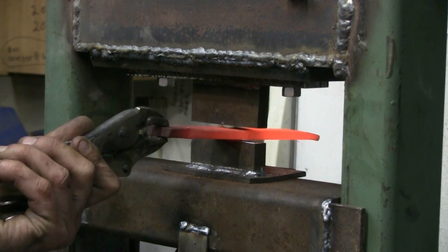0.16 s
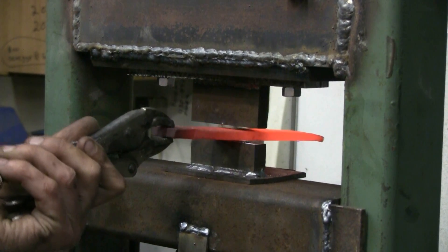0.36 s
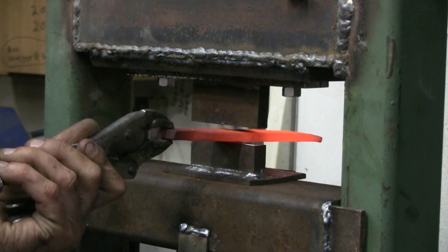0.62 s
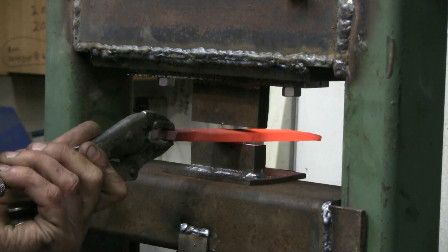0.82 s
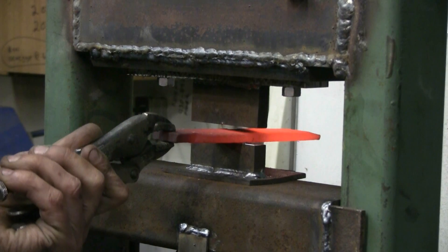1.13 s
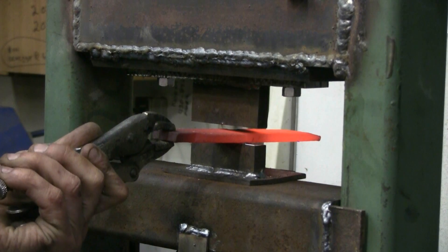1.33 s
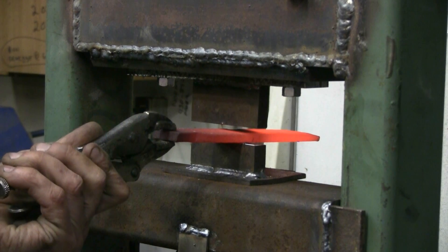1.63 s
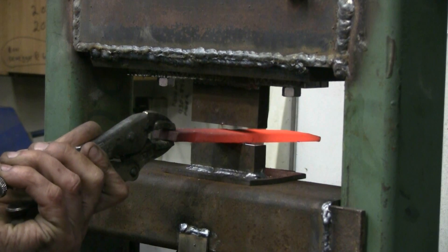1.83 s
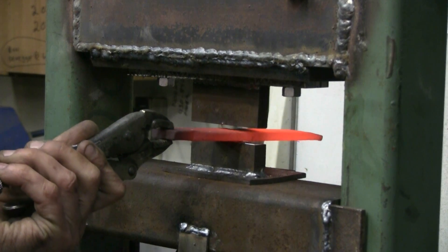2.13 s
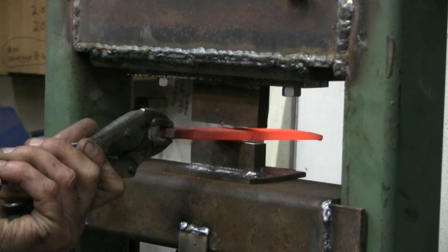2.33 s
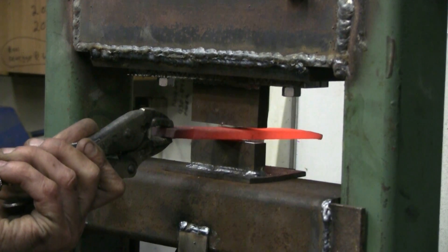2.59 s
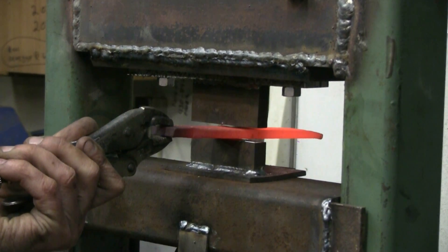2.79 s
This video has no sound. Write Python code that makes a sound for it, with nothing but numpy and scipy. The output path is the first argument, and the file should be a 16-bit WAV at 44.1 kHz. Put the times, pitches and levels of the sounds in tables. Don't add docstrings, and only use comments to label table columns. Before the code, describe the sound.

A gas forge roars close and low with slight overload; near two seconds a lever clicks, air whistles briefly, and a pneumatic jack pump fires bright, rapid exhaust puffs until the end, in a small workshop.

```python
import sys
import numpy as np
from scipy import signal
from scipy.fft import rfft, irfft, next_fast_len
from scipy.io import wavfile
from scipy.ndimage import uniform_filter1d, map_coordinates

SR = 44100
rng = np.random.default_rng(int(sys.argv[2]) if len(sys.argv) > 2 else 0)


def dump(signal):
    limited = np.clip(np.atleast_2d(signal).T, -1, 1)
    pcm = np.round(limited * 32767).astype(np.int16)
    wavfile.write(sys.argv[1], SR, pcm)


def decibels_to_gain(level_db):
    exponent = np.asarray(level_db, float) / 20
    return 10 ** exponent


N = 130095
T = np.arange(N) / SR

# (frequency [Hz], correlation [-1..1])
PUMP_ALIKE = [(60, 0.63), (240, 0.74), (950, 0.88), (3770, 0.96), (15000, 0.31)]
# (frequency [Hz], left over right [dB])
PUMP_LEAN = [(60, 0.5), (130, 0.5), (290, 0.0), (640, -0.5), (1410, 0.0), (3100, 0.5), (6820, -2),
             (15000, 3)]


def unit(x):
    return x / np.sqrt(np.mean(x ** 2) + 1e-20)


def along(points, hz):
    f, v = np.transpose(points)
    return np.interp(np.log(hz + 1), np.log(f + 1), v)


def over_time(points):
    return np.interp(T, *np.transpose(points))


def humps(rows, hz):
    return sum(db / (1 + (2 * (hz - centre) / width) ** 2) for centre, width, db in rows)


def band(x, lo_hz, hi_hz):
    return signal.sosfiltfilt(signal.butter(6, [lo_hz, hi_hz], "band", fs=SR, output="sos"), x)


def wobble(rate):
    knots = rng.standard_normal(int(N * rate / SR) + 4)
    return map_coordinates(knots, [T * rate])


def rush(colour_db, alike, lean, patchy_db):
    z = signal.stft(rng.standard_normal((2, N)), nperseg=512)[2]
    patches = uniform_filter1d(rng.standard_normal(z.shape[1:]), size=5, axis=0)
    patches = unit(uniform_filter1d(patches, size=8, axis=1))
    noise = signal.istft(z * decibels_to_gain(patchy_db * patches), nperseg=512)[1][:, :N]
    size = next_fast_len(N)
    a, b = rfft(noise, size)
    hz = np.fft.rfftfreq(size, 1 / SR)
    turn = np.arccos(np.clip(along(alike, hz), -1, 1)) / 2
    tilt = decibels_to_gain(along(lean, hz) / 2)
    shared, opposed = a * np.cos(turn), b * np.sin(turn)
    stereo = np.array([(shared + opposed) * tilt, (shared - opposed) / tilt])
    return unit(irfft(decibels_to_gain(colour_db(hz)) * stereo, size)[:, :N])


def flame(alike, lean):
    # (time [s], level [dB])
    strength = [
        (0, -8.8),
        (.5, -8.2),
        (.9, -8.8),
        (2.0, -8.6),
    ]
    # (frequency [Hz], density [dB per Hz])
    roar_colour = [(30, -47.5), (70, -35.5), (130, -23.5), (200, -8.5), (350, 2), (520, -9.5), (650, -24),
                   (760, -40)]
    # (frequency [Hz], width [Hz], gain [dB])
    room_modes = [(104.5, 20, 9.5), (216, 10.5, 10), (330.7, 11.7, 3.5), (424.3, 53, 10.5),
                  (469.6, 26.4, 7), (530.3, 33, 5.5), (586.5, 33, 2.5), (712, 80, 16), (390, 20.6, -23),
                  (445.4, 16.7, -29.5), (238.6, 45, 1)]
    # (time [s], peak [dB], pitch [Hz])
    surges = [(.109, -19, 436), (.145, -15.5, 392), (0.213, -30, 380), (.267, -14.5, 360), (.312, -26, 457),
              (.455, -17, 370), (.59, -20.5, 345), (0.959, -20.5, 403), (1.041, -19, 350),
              (1.15, -17.5, 505), (1.214, -29, 376), (1.42, -20, 363), (1.602, -19.5, 330),
              (1.752, -19.5, 390), (1.904, -19.5, 336)]
    surge_s, surge_lift_db, surge_grows = 0.0036, 7.3, 0.25
    steady_s, steady = 0.035, 0.5

    roar = rush(lambda hz: along(roar_colour + [(900, -120)], hz) + humps(room_modes, hz),
                alike, lean, patchy_db=1.6)
    power = uniform_filter1d(roar.mean(axis=0) ** 2, size=int(steady_s * SR))
    swell = np.sqrt(np.abs(uniform_filter1d(power, size=400))) + 0.074
    roar = unit(roar * swell ** -steady) * decibels_to_gain(over_time(strength))

    change = np.zeros((2, N))
    for (s, db, hz), phase in zip(surges, rng.uniform(0, 2 * np.pi, len(surges))):
        swing = decibels_to_gain(surge_lift_db + surge_grows * db) * np.sin(2 * np.pi * hz * (T - s) + phase)
        change += np.exp(-((T - s) / surge_s) ** 2) * (swing - roar)
    return roar + band(change, 112, 520)


def burner_tube(alike, lean):
    # (frequency [Hz], density [dB per Hz])
    jet_colour = [(450, -42), (760, -1.5), (1860, -14.5), (2320, -12), (2720, -13), (3780, -12.5),
                  (4120, -15.5), (5880, -18), (14200, -29.5)]
    # (frequency [Hz], width [Hz], gain [dB])
    tube = [(874, 80, 3.5), (962, 49, 5.5), (1627, 90, 11), (2355, 70, 12.5), (2170, 36, 5), (3115, 45, 12),
            (3810, 59, 9.5), (750, 18, -14), (5600, 34, 8), (5910, 720, 9.5), (6500, 320, 5.5),
            (7800, 250, 0), (11860, 100, 10)]
    # (time [s], level [dB])
    jet_flow = [
        (0.0, -38.5),
        (0.026, -36.5),
        (0.932, -36.5),
        (1.482, -38),
        (1.582, -34),
        (1.98, -37),
    ]
    quiet_top_hz = 14250

    jet = rush(lambda hz: along(jet_colour, hz) + humps(tube, hz) - 60 * (hz > quiet_top_hz),
               alike, lean, patchy_db=1.2)
    return decibels_to_gain(6 + over_time(jet_flow) + 0.3 * wobble(9)) * jet


def forge():
    # (frequency [Hz], correlation [-1..1])
    alike = [(60, 0.99), (180, 1.0), (550, 0.98), (1650, 0.91), (4970, 0.79), (15000, -0.45)]
    # (frequency [Hz], left over right [dB])
    lean = [(60, 0.0), (240, 0.34), (950, -0.84), (3770, -0.044), (15000, 0.0)]
    return flame(alike, lean) + burner_tube(alike, lean)


def pump():
    # (time [s], peak [dB])
    puffs = [(2.051, -3), (2.1158, -3), (2.178, -3.5), (2.2415, -2), (2.3045, -2.5), (2.37, -2),
             (2.4334, -3.5), (2.498, -3), (2.563, -2.5), (2.6284, -2), (2.6937, -2.5), (2.7566, -3),
             (2.8214, -3), (2.8877, -2.5)]
    # (frequency [Hz], density [dB per Hz])
    exhaust = [(400, -33), (700, -20), (1900, -16.5), (3200, -13.5), (6000, -8), (9300, -6.5),
               (11000, -10.5), (15700, -10.5)]
    # (frequency [Hz], width [Hz], gain [dB])
    muffler = [(3480, 900, 3.5), (6080, 650, 5), (7000, 500, -2), (8320, 900, 3), (9700, 660, 2),
               (12500, 400, 6.5), (13500, 370, 8), (14800, 500, 6.5)]
    # (frequency [Hz], duration [s])
    open_s = [(1500, 0.023), (6000, 0.027), (14000, 0.024)]
    # (frequency [Hz], fall [dB per s])
    fall = [(1500, 300), (4000, 377), (8500, 422.5), (14000, 698)]
    # (frequency [Hz], level [dB])
    rest = [(800, -3.5), (1500, -4), (4000, -15.5), (8500, -14.5), (14000, -31)]
    puff_db, rise_s, lead_s, sag_db_per_s = 8.5, 0.0022, 0.0026, 125
    spit_db, spit_s = -3, 0.0036
    scatter_db = 0.7
    weak_puff = (2.7, -6)

    air = rush(lambda hz: along(exhaust, hz) + humps(muffler, hz), PUMP_ALIKE, PUMP_LEAN, patchy_db=1.0)
    hz, t, z = signal.stft(air, SR, nperseg=64)
    level = np.zeros(z.shape[1:])
    for s, db in puffs + [weak_puff]:
        age = np.maximum(t - s + lead_s, 0)
        shut_for = np.maximum(age - along(open_s, hz)[:, None], 0)
        spit = spit_db * np.exp(-age / spit_s)
        fade = decibels_to_gain(spit - sag_db_per_s * age - along(fall, hz)[:, None] * shut_for)
        colour = scatter_db * unit(uniform_filter1d(rng.standard_normal(len(hz)), size=3))[:, None]
        rise = 1 - np.exp(-(age / rise_s) ** 2)
        level = np.maximum(level, decibels_to_gain(db + colour) * rise * fade)
    leak = decibels_to_gain(along(rest, hz) - 5)[:, None] * (t > puffs[0][0])
    return decibels_to_gain(puff_db) * signal.istft(z * np.hypot(level, leak), SR, nperseg=64)[1][:, :N]


def lever():
    # (time [s], peak [dB])
    ticks = [
        (1.863, -33.5),
        (1.869, -29.5),
        (1.8745, -40),
    ]
    # (frequency [Hz], density [dB per Hz])
    click_colour = [(3000, -4), (8000, -6), (14200, -10), (14400, -74)]
    level = sum(decibels_to_gain(db + 2 - 60 * np.abs(T - s) / 0.018) * (T > s) for s, db in ticks)
    return level * rush(lambda hz: along(click_colour, hz), PUMP_ALIKE, PUMP_LEAN, patchy_db=0)


def valve():
    # (frequency [Hz], density [dB per Hz])
    inrush = [(600, -6), (3000, -4), (8000, 0), (11000, -5), (15700, -15)]
    # (start [s], end [s], frequency [Hz], width [Hz], level [dB])
    whistles = [
        (2.008, 2.05, 8130, 500, -26),
        (2.034, 2.056, 6800, 250, -22.5),
        (2.031, 2.047, 5170, 500, -24),
        (2.04, 2.056, 1249, 70, -13.5),
        (2.038, 2.05, 1400, 70, -17),
        (2.006, 2.04, 4950, 400, -38),
    ]
    start_s, end_s = 2.002, 2.051
    from_db, to_db, bend = -48, -13, 0.8

    air = rush(lambda hz: along(inrush, hz), PUMP_ALIKE, PUMP_LEAN, patchy_db=0.0)
    shut = np.clip((end_s - T) / 0.0016, 0, 1)
    grow = np.clip((T - start_s) / (end_s - start_s), 0, 1)
    out = air * shut * (T > start_s) * decibels_to_gain(from_db + (to_db - from_db) * grow ** bend)
    for s, end, hz, width, db in whistles:
        tone = rush(lambda f: -20 * np.log10(1 + (2 * (f - hz) / width) ** 2),
                    [(100, 0.98)], [(100, -1)], patchy_db=1.5)
        out = out + decibels_to_gain(db) * np.clip(np.minimum(T - s, end - T) / 0.0024, 0, 1) * tone
    return out


def scene():
    return forge() + pump() + lever() + valve()


def band_limit(x):
    return signal.sosfilt(signal.butter(12, 16840, fs=SR, output="sos"), x)


def record(dry):
    # (time [s], gain [dB])
    gain = [
        (2.022, 0),
        (2.043, -2),
        (2.054, -14.5),
        (2.2, -15),
        (2.95, -15),
    ]
    duck_s = 2.005
    dip_db, dip_at_db = 4.5, -3.5
    top, knee = 1.04, 6.5
    top_hz = 15730

    treble = signal.butter(2, 3000, "high", fs=SR, output="sos")
    bright = signal.sosfilt(treble, dry.mean(axis=0))
    loud = np.sqrt(np.abs(uniform_filter1d(bright ** 2, size=400)))
    dip = dip_db * np.tanh(loud / decibels_to_gain(dip_at_db))
    x = dry * decibels_to_gain(over_time([(duck_s, 0)] + gain) - dip)
    x = x / (1 + np.abs(x / top) ** knee) ** (1 / knee)
    hz = np.fft.rfftfreq(2 * N, 1 / SR)
    cut_db = -45 * np.clip((hz - top_hz) / 120 + 0.5, 0, 1)
    x = irfft(rfft(x, 2 * N) * decibels_to_gain(cut_db))[:, :N]
    return band_limit(x)


dry = scene()
out = record(dry)
dump(out)
```